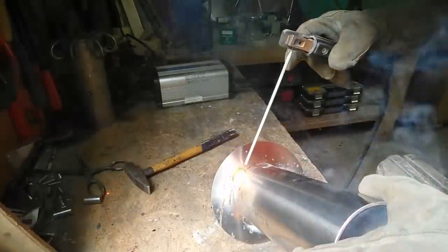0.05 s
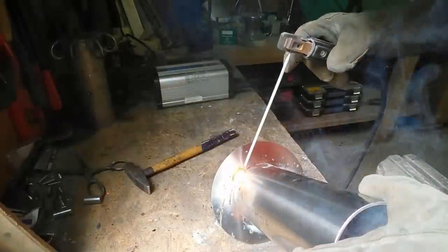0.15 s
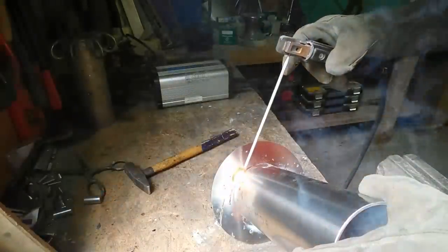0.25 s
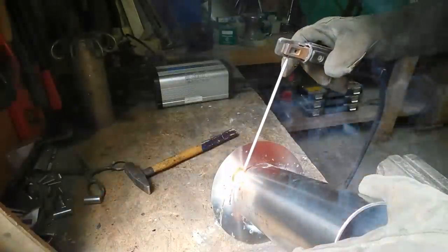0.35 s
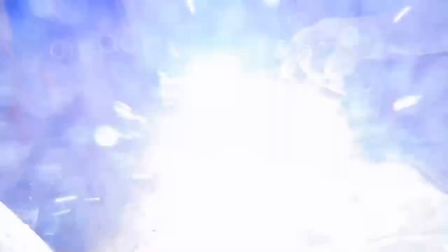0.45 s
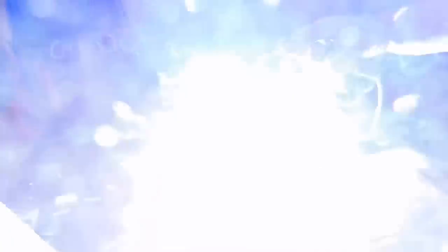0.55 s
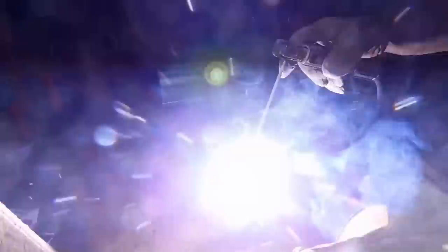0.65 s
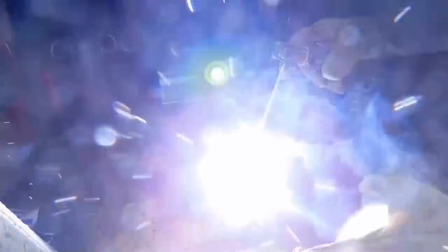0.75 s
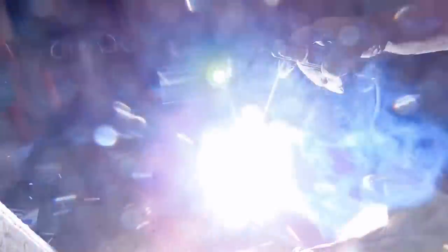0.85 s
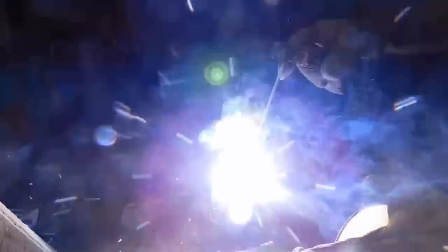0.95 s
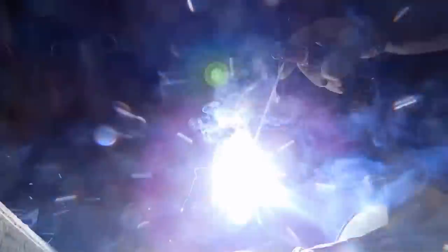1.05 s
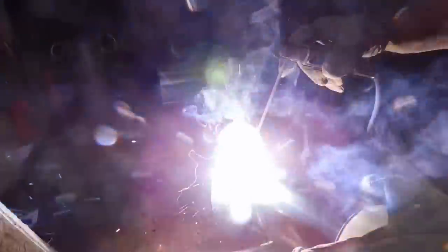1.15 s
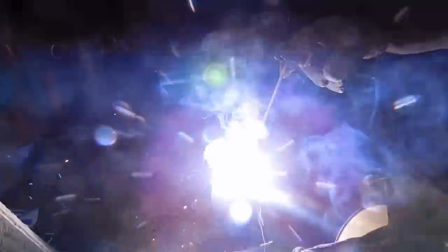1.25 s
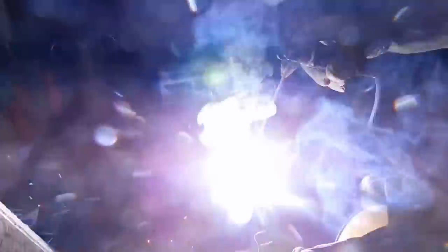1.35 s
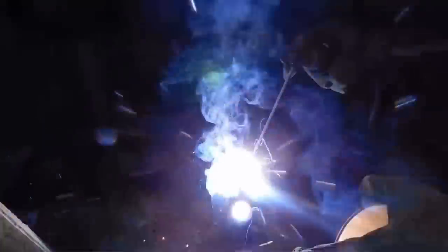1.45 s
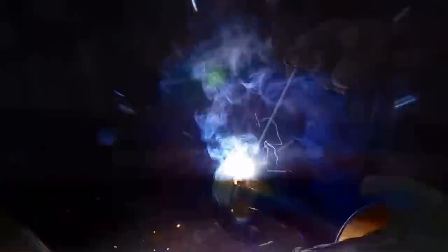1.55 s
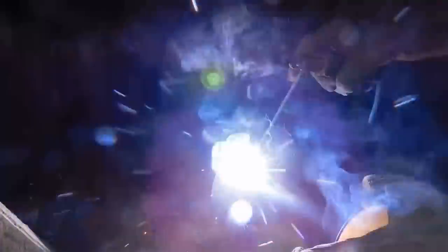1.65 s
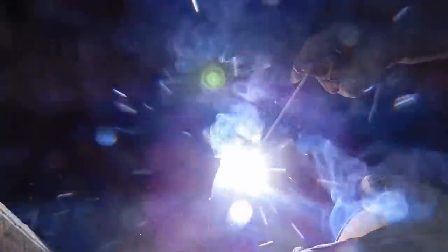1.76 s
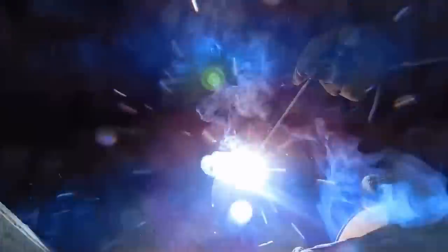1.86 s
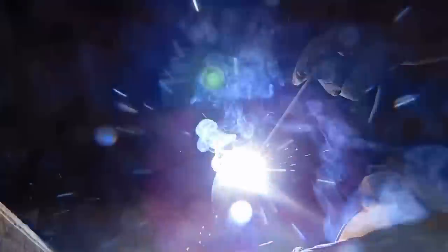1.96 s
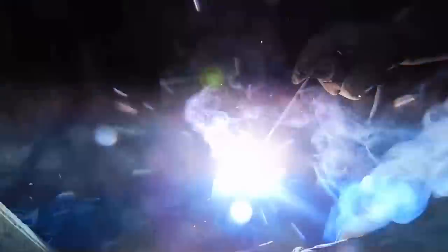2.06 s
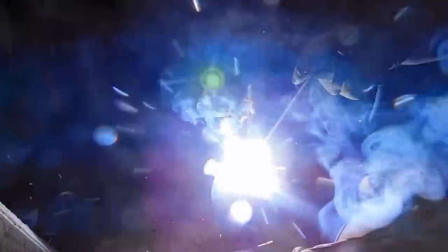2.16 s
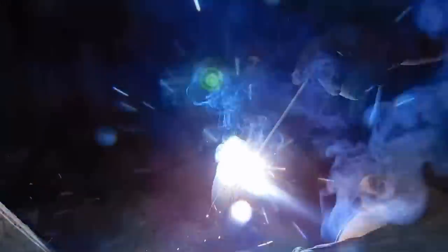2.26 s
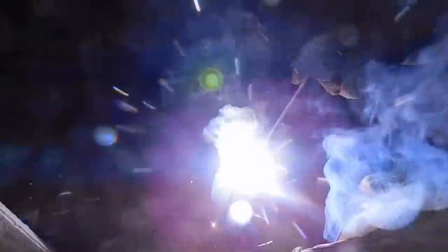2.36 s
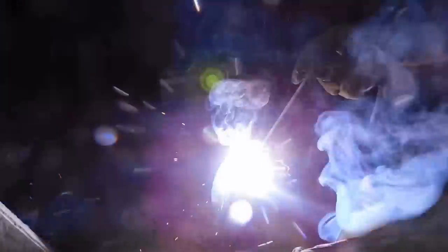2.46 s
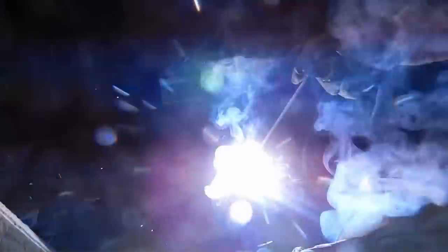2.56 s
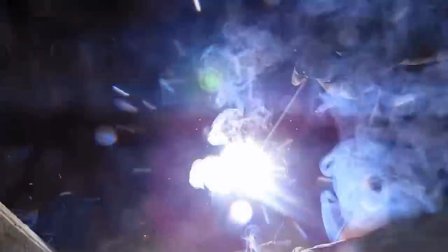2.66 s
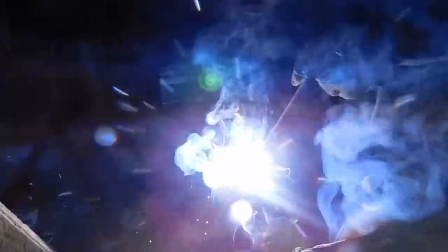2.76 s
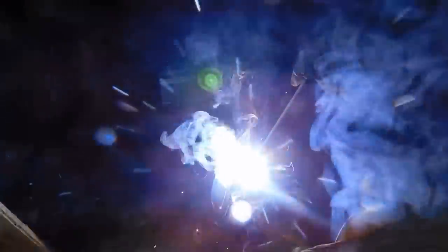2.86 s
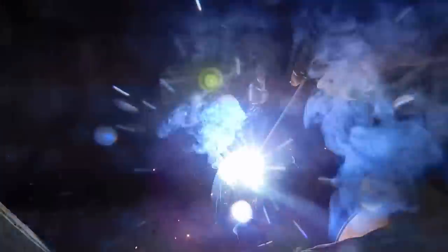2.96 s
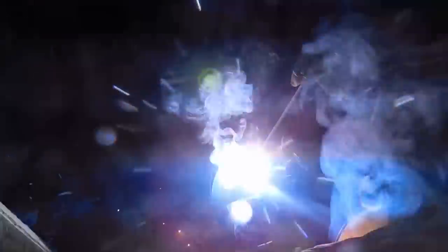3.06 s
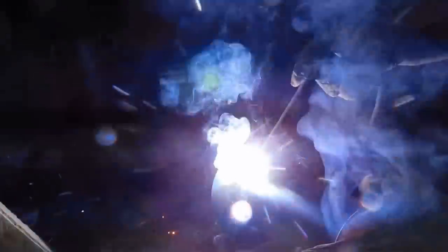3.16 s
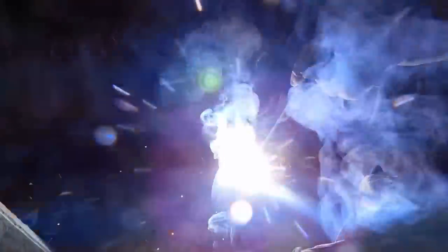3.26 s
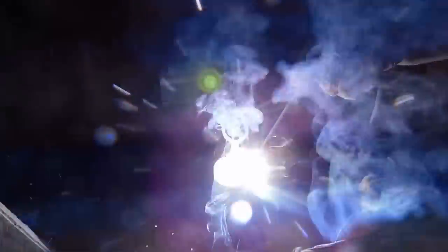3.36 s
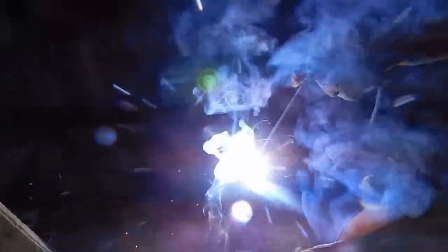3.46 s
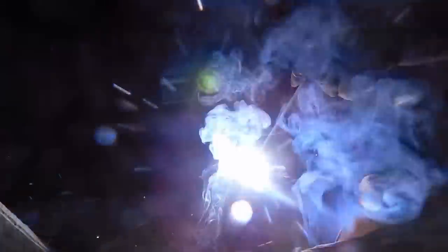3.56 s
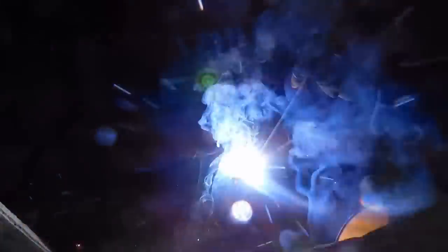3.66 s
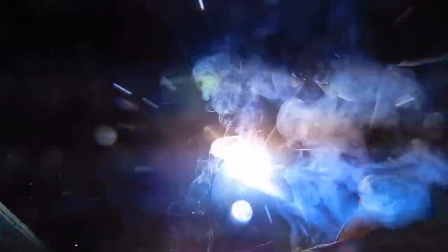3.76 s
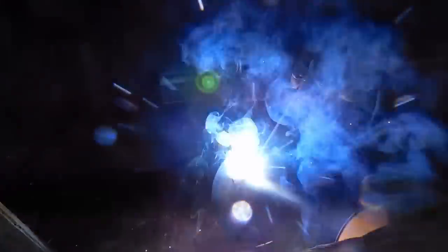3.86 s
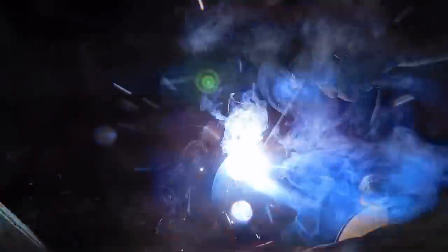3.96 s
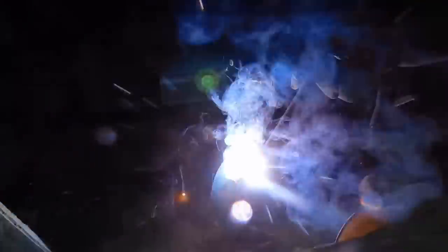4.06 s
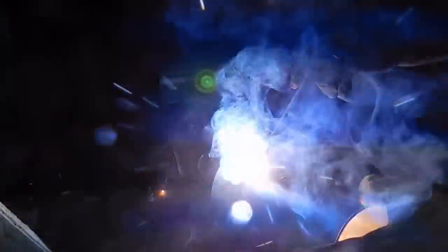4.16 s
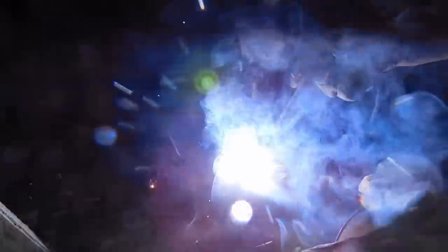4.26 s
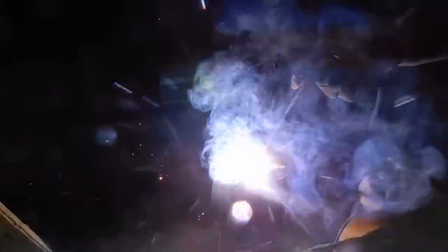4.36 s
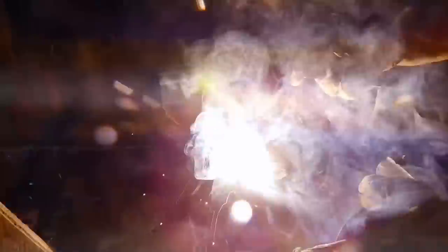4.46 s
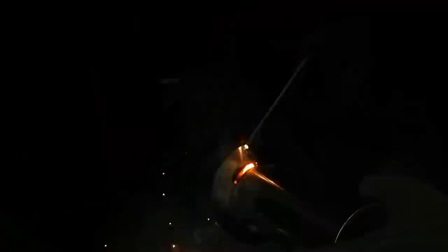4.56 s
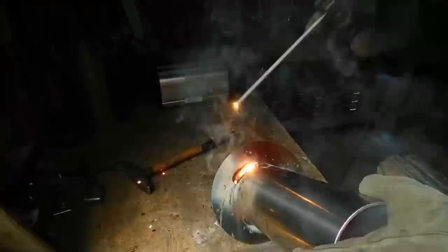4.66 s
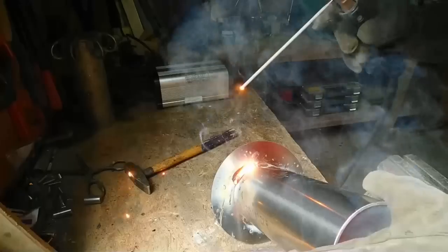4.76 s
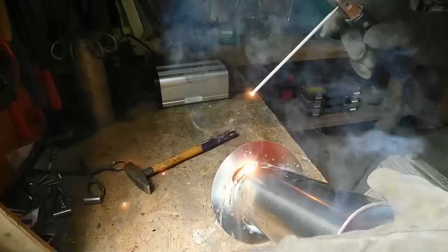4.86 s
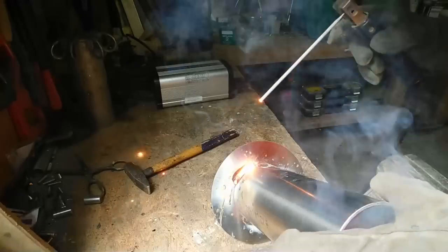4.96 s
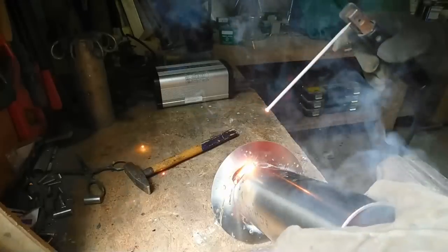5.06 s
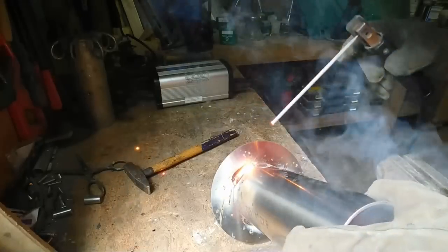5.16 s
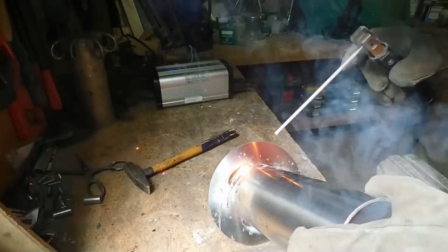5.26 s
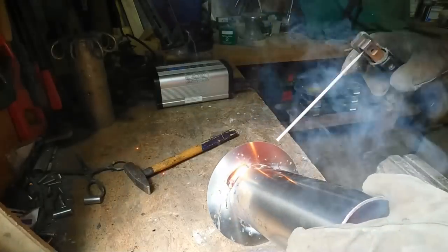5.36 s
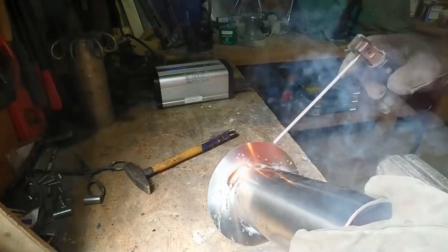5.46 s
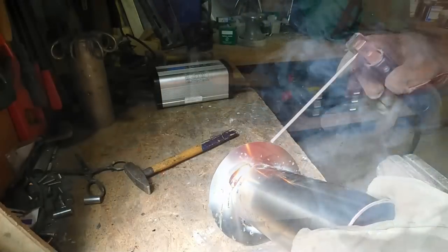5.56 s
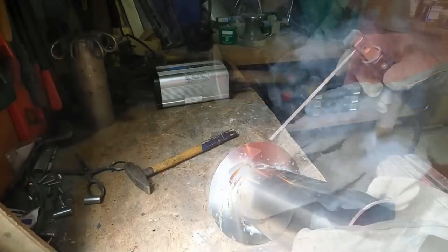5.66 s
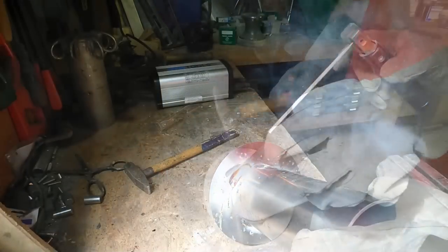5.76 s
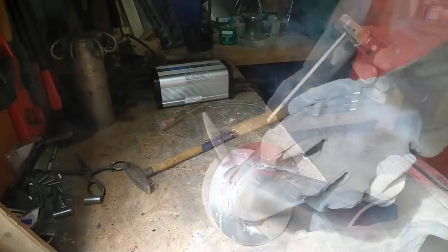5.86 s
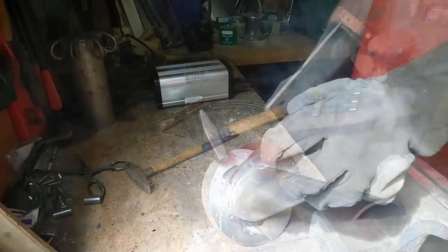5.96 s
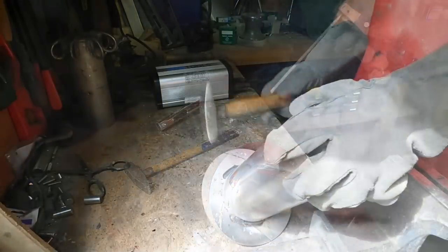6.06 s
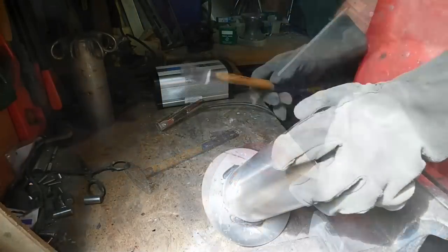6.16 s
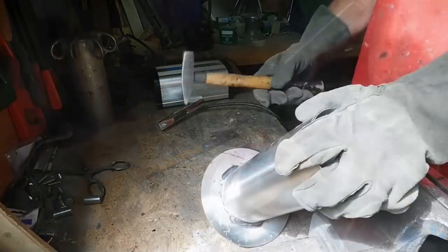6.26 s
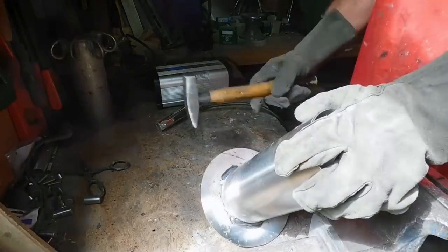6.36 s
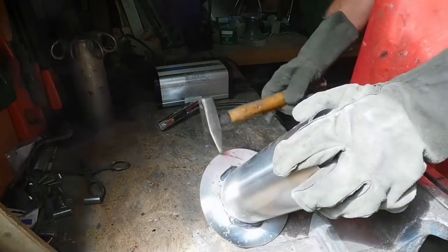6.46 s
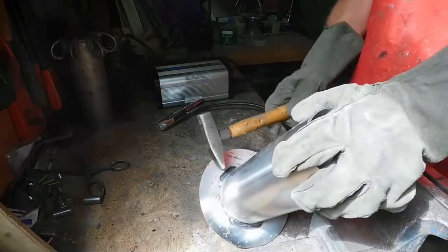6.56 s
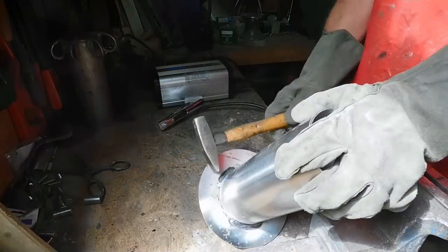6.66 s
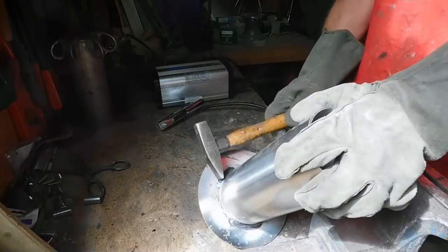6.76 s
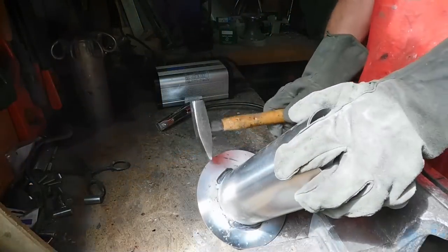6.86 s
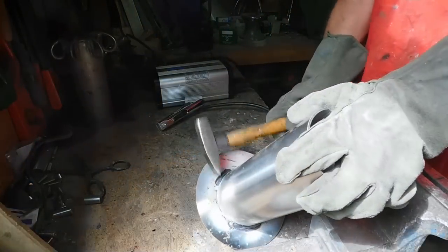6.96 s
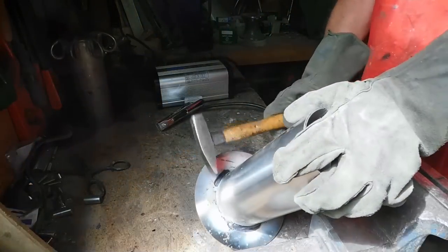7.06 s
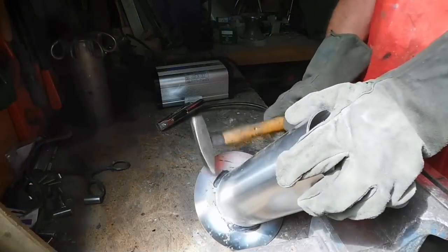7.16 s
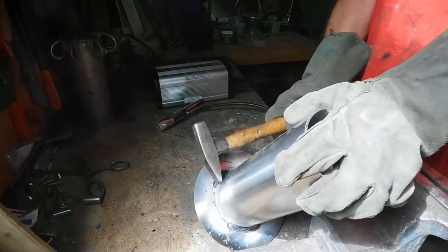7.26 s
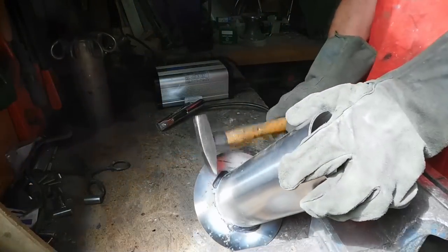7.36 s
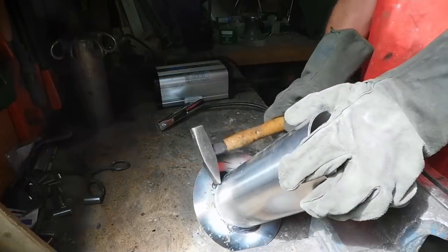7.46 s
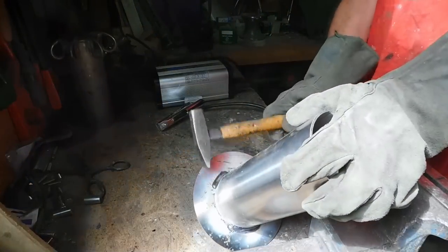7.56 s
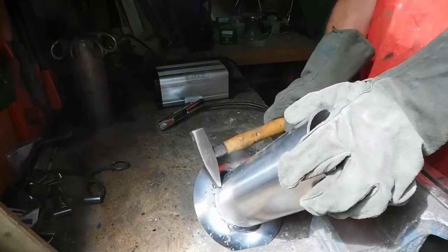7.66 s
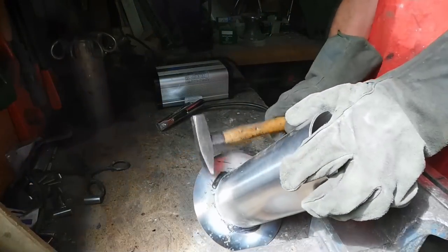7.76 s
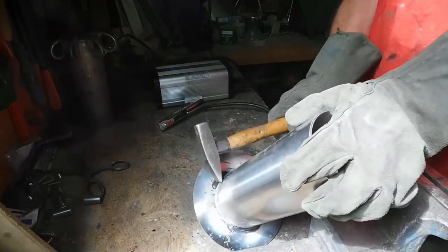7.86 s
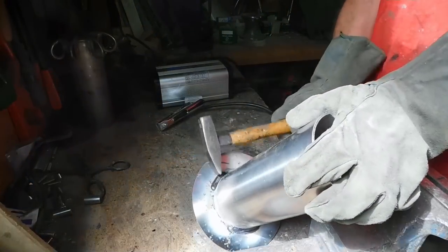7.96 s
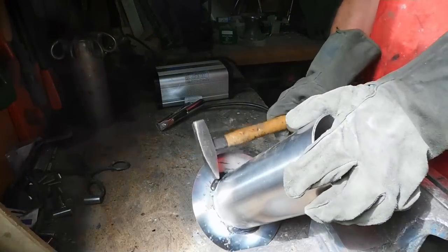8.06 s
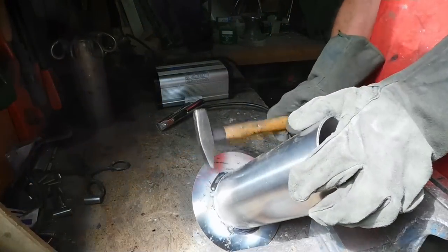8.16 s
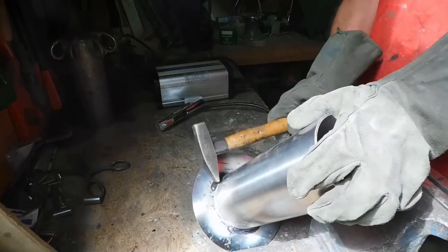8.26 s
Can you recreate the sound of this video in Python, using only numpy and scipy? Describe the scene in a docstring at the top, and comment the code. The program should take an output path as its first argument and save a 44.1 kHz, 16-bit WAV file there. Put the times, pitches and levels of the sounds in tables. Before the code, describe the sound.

A close stereo view of a workbench in a small, short-echoing workshop. At first only a soft fan is heard, airy with faint wavering tones, and a tiny metal tick. At about 0.45 s a welding arc ignites with a sharp snap, breaks off at 0.6, and catches again at 0.67. It crackles and sizzles until 4.5 s, rough and dense, strongest between 1 and 1.4, with irregular pops, bright spatter spurts and dull low sputter that swells and drops. It stops abruptly; the fan whirs on. Small ticks and soft knocks come at 5.1 to 5.3, firmer woody thuds near 5.5. A light metallic tap lands at 5.87, and the fan fades just after 6. Faint handling follows, then light taps at 6.58 and 6.7. From 6.96 to 8.2 hard hammer blows come roughly every 0.2 s, cracking, clattering and ringing the steel pipe in changing pitches, the flange rattling dully.

```python
"""A workbench in a small workshop: a steel pipe is stick-welded to its flange beside the welder's fan.
The arc (random clicks shaped by filters) strikes, falters, then crackles for about four seconds.
Dull noise bursts follow as the electrode holder is put down; the fan (noise and wavering tones) fades away.
A chipping hammer knocks the slag off: hard cracks, decaying pipe modes and sprays of clatter,
with a flange that rattles on the bench and a gain control that ducks the loud peaks."""
import sys
import numpy as np
from scipy import signal
from scipy.fft import rfft, irfft
from scipy.io import wavfile
from scipy.ndimage import uniform_filter1d

SR = 44100
rng = np.random.default_rng(int(sys.argv[2]) if len(sys.argv) > 2 else 0)


def transcribe(u):
    """Save the signal u as a 16-bit wav file named by the first command-line argument.

    u: samples, shape (n,) or (channels, n), limited to [-1, 1]; the rate is SR.
    q: integer samples, one column per channel.
    """
    v = np.clip(np.atleast_2d(u).T, -1, 1)
    q = np.round(v * 32767).astype(np.int16)
    wavfile.write(sys.argv[1], SR, q)


N = 366471
TIME = np.arange(N) / SR

# All table levels are relative; gains in the functions shift them. t60_s is the time to fall by 60 dB.
# Arc burning: on_s, off_s
BURN_SPANS = [(0.461, 0.603), (0.667, 4.515)]
# Vigour of the arc: time_s, crackle_level_db, sizzle_level_db
ARC_VIGOUR = [(1.1, -34.5, -40), (1.25, -34, -37.5), (1.36, -35.5, -42), (1.48, -40.5, -42),
              (2.35, -40, -42.5), (2.43, -35.5, -40.5), (2.7, -38.5, -41), (3.15, -38.5, -40.5),
              (3.8, -39, -42.5), (4.0, -41, -44), (4.34, -36.5, -44), (4.36, -40.5, -46),
              (4.45, -36, -38.5), (4.51, -35, -44)]
# Bass of the arc, which swells and drops out: time_s, level_db
ARC_BASS_LEVEL = [(0.68, -65), (0.7, -56), (0.85, -57), (1.02, -57), (1.05, -46.5), (1.12, -58),
                  (1.22, -45.5), (1.32, -57), (1.37, -45.5), (1.46, -61), (1.6, -52.5), (1.86, -53),
                  (2.01, -52), (2.04, -62), (2.08, -60), (2.12, -53), (2.52, -49), (3.84, -53), (3.86, -56),
                  (4.0, -49), (4.06, -56), (4.5, -48.5)]
# Ignition and the biggest drops shorting the arc: start_s, level_db, lowpass_hz
DROP_POPS = [(0.4654, 8, 4130), (0.596, -7, 3500), (0.6046, 3, 3800), (0.668, 9, 3620), (0.7472, -2, 4530),
             (0.837, 2.5, 2980), (1.067, -2, 6000), (1.094, 0, 3000), (1.281, -4, 3000), (1.407, 3, 4030),
             (1.459, -1, 4030), (1.583, -0.5, 5000), (1.607, -2, 2400), (1.649, 2, 4800), (1.9145, 0, 4000),
             (1.9643, 3, 4160), (2.011, -2, 2400), (2.082, 1, 3000), (2.095, -2.5, 4000), (2.2931, 1, 4500),
             (2.4189, -3, 3000), (2.537, -1, 3000), (2.6276, -1, 4000), (2.6675, -7, 4560),
             (3.389, 0, 2600), (3.59, -5.5, 4000), (3.633, -8, 2200), (3.7586, 1.5, 3530),
             (3.814, -4, 4000), (3.9054, -2.5, 5000), (4.07, -9, 4000), (4.186, 0.5, 4500),
             (4.346, -1, 4500), (4.497, -2, 4000)]
# Strongest sprays of fine spatter: start_s, level_db, t60_s
SPATTER_SPURTS = [(0.466, -32, 0.17), (0.677, -26, 0.15), (0.755, -28, .07), (1.067, -26.5, 0.084),
                  (1.161, -33, .08), (1.579, -23.5, 0.063), (1.9647, -29, .06), (2.293, -30, .05),
                  (2.36, -32, .07), (3.5, -33, .05), (3.785, -28, 0.048), (3.898, -27.5, 0.092),
                  (3.964, -27, 0.046), (4.04, -28.5, 0.064), (4.40, -35, .15)]
# Gas bursting out of the molten pool: start_s, level_db, pitch_hz
GAS_PLOPS = [(1.047, -28.5, 348), (1.581, -31, 447), (2.011, -33, 756), (2.537, -42, 600), (3.5, -34, 300),
             (3.759, -47, 400), (3.989, -33.5, 356), (4.188, -35, 800)]
# Colour of the sparks: frequency_hz, density_db (per Hz)
SPARK_SPECTRUM = [(25, -9.5), (60, -6), (150, -8.5), (550, -8), (900, -6.5), (1800, -5.5), (2100, -1),
                  (3600, -0.46), (4200, -4), (6100, -3.5), (8400, -2), (9200, -3), (11000, -6), (15500, -9)]
# Short resonances of bench and pipe in the sparks (negative is a dip): centre_hz, width_hz, rise_db
SPARK_RESONANCES = [(1434, 66, 4.5), (1834, 30, -8.5), (4890, 440, 2.5), (6900, 180, 0), (7100, 140, 1),
                    (7630, 74, 4.5), (12760, 200, 4.5)]
# Corner of pipe and flange, higher as the electrode moves along the seam: time_s, centre_hz
CORNER_GLIDE = [(0.5, 2090), (4.5, 2400)]
# Hammer blows: start_s, force_db, crack_db, chatter_t60_s, rebound_delay_s, rebound_db, rattle_s,
# zing_db, ring_db, ring_tilt_db_per_octave, singing_lift_db
HAMMER_BLOWS = [(5.865, -41.5, -15, 0.04, 0.012, -11, 0.0027, -75, -49.5, -3, 10),
                (6.5782, -43.5, -7, 0.18, 0.0099, -10, 0.0084, -72, -46.5, -2.8, 12),
                (6.7058, -33.5, -7, 0.092, 0.012, -15, 0.0069, -45, -43.5, 0, 11),
                (6.9574, -20, 8, 0.16, 0.021, 0, 0.056, -28, -30, -0.5, 7.5),
                (7.1701, -22, 11, 0.2, .014, -1, 0.089, -33, -26.5, 2.8, 6.5),
                (7.380, -21, 12, 0.1, 0.017, -5, 0.037, -46, -31.5, 4, 6),
                (7.575, -22, -2, 0.14, 0.019, 3, 0.044, -54, -34, 3.5, 3.5),
                (7.7806, -21, 3, 0.1, 0.017, -3.5, 0.035, -46, -32, 6.5, 4.5),
                (7.944, -20, 7.5, 0.12, 0.043, -8, 0.046, -43, -31, -0.2, 4),
                (8.15, -31, -2, 0.16, 0.015, 2, 0.027, -54, -44.5, 1.5, 10.5),
                (8.197, -22.5, -10, 0.11, 0.013, -7, 0.04, -41, -37, -5.5, 1.5)]
# Spot on the seam under each blow: place_m, singing_pitch_hz
BLOW_SPOTS = [(.302, 3734), (.698, 3734), (.178, 1390), (.354, 2408), (.112, 1215), (.408, 1555),
              (.428, 998), (.06, 998), (.564, 2408), (.48, 3734), (.17, 1215)]
# Modes of pipe and flange: frequency_hz
PIPE_MODE_HZ = [998, 1205, 1223, 1390, 1522, 1588, 2172, 2408, 2419, 2560, 2987, 3321, 3734, 3989, 4081,
                4549, 4807, 5157, 5399, 5792, 6831, 7120, 8123, 8516, 9330, 12350]
# Ringing of each of those modes: level_db, t60_s, left_minus_right_db
PIPE_MODE_RING = [(-3, 3.3, 2), (-3.5, 0.92, -9), (2.5, 1.44, -10.5), (-2, 0.44, -9), (1.2, 0.64, 2),
                  (0, 0.77, -2), (1.5, 0.31, 5), (10.5, 0.56, -13.5), (0, 0.35, -6), (-9, 0.18, 13),
                  (1.2, 0.41, 0), (0, 0.08, 11), (0.5, 0.31, -12), (0, 0.24, 26), (2.5, 0.21, -20),
                  (-8, 0.34, -2), (-22, 0.24, 11), (-8.5, 0.42, -3), (0, 0.14, -6), (-19, .1, 0),
                  (-14, 0.17, 0), (-4, 0.13, -3), (-27, .18, 0), (-8, 0.23, 4), (-16, 0.33, -3),
                  (-16, 0.15, 0)]
# Brightness looked up by force, low for light blows and high for heavy ones: force_db, lowpass_hz
FORCE_BRIGHTNESS = [(-24, 3100), (-37, 4400), (-22, 19000), (-19.5, 13300)]
# Clatter of pick, slag and flange: frequency_hz, density_db (per Hz)
CLATTER_SPECTRUM = [(25, -2), (90, -5.5), (220, -3), (500, -8), (850, -1.5), (1400, -1), (2200, 1.5),
                    (3600, -2), (5000, -4.5), (6100, -8.5), (7500, -6.5), (10000, -13), (15500, -15)]
# Short resonances of pick and flange (negative is a dip): centre_hz, width_hz, rise_db
CLATTER_RESONANCES = [(1660, 90, 3.5), (3140, 64, 5.5), (3420, 90, 5), (3790, 100, 6.5), (4570, 120, 3.5),
                      (5220, 70, 4), (6200, 390, -5), (7630, 120, 4), (8520, 130, 6.5)]
# Pick grazing the steel: start_s, level_db
PICK_GRAZES = [(6.031, -55), (6.68, -59)]
# High modes that a graze excites: frequency_hz, level_db, t60_s
GRAZE_RING = [(2987, -4.5, 0.48), (5230, -5, 0.36), (7214, -7, 0.18), (7900, -2, 0.24), (8123, -2, 0.14),
              (9900, 6, 0.16)]
# Things set down on the bench: start_s, level_db, t60_s, lowpass_hz
BENCH_KNOCKS = [(5.14, -45, 0.07, 2200), (5.287, -42, 0.12, 700), (5.4686, -28.5, 0.071, 1700),
                (5.5693, -27, 0.031, 4470), (5.582, -31.5, 0.048, 2530), (6.313, -54.5, 0.079, 900),
                (6.435, -40.5, 0.012, 4470)]
# Bench top: frequency_hz, density_db (per Hz)
BENCH_SPECTRUM = [(40, -24), (90, -13), (140, -14), (240, -1), (323, -6.5), (480, 3), (650, 1), (845, 0.5),
                  (1300, -10), (2100, -5.5), (3200, -12), (4200, -7), (7000, -13), (15000, -3.5)]
# Wooden resonances of the bench top: centre_hz, width_hz, rise_db
BENCH_RESONANCES = [(110, 25, 10), (245, 35, 10), (305, 50, 14), (860, 64, 7), (2100, 130, 8.5),
                    (2537, 140, 16), (4240, 120, 5)]
# Light ticks and scrapes of metal and slag: start_s, level_db, t60_s, pitch_hz
METAL_TICKS = [(0.264, -52.5, 0.036, 8000), (4.615, -50, 0.054, 9000), (5.139, -37, 0.075, 2730),
               (5.14, -47.5, 0.11, 11000), (6.004, -43.5, 0.066, 10100), (6.031, -40.5, 0.12, 8450),
               (6.335, -49, 0.21, 3120), (6.677, -42, 0.18, 8250)]
# Fan: time_s, level_db
FAN_LEVEL = [(0, -52), (0.4, -50.5), (0.8, -56.5), (4.65, -58.5), (4.95, -52), (5.4, -49.5), (5.7, -57.5),
             (5.95, -59.5)]
# Rush of the fan: frequency_hz, density_db (per Hz)
FAN_AIR_SPECTRUM = [(30, -31), (120, -22.5), (250, -10), (390, 6.5), (560, -6), (900, -0.5), (1150, -5),
                    (1550, -1), (2200, -8), (3200, -18), (6000, -21), (11000, -27), (16000, -28)]
# Blade tones: frequency_hz, width_hz, level_db
BLADE_TONES = [(388, 45, -15), (1165, 6.8, -8), (1540, 26, -15.5)]
# Quiet of the workshop: frequency_hz, density_db (per Hz)
QUIET_SPECTRUM = [(30, -34), (150, -28), (400, -16.5), (1000, -2.5), (2500, -8.5), (6000, -19),
                  (15000, -25.5)]

# the electrode touches and fizzes feebly, relative to the full arc, until the arc holds
TOUCH_S, FIZZ_DB, DIE_OUT_S = 0.42, -15.5, 0.0029
# a cold electrode crackles and sizzles less until it has warmed up
COLD_CRACKLE_DB, COLD_SIZZLE_DB, WARM_UP_S = -5, -8, 1
POOL_HZ = 740  # the arc's bass lies below this
# bending wavelength at 1 kHz; share of a mode that still sounds when it is struck on a node
WAVELENGTH_M, NODE_SHARE = 0.17, 0.2
SINGING_WIDTH = 0.034  # modes within this share of the singing pitch are lifted with it
TILT_TOP_HZ = 3200  # the spectral tilt of the ring is level above this
ZING_HZ, ZING_SWELL_S = 4807, 0.032
FAN_FADE_S, FAN_FADE_DB_PER_S = 6.04, 72
ROOM_T60_S = 0.19
CUTOFF_HZ = 15850


def arc(split_hz=5200, crackle_db=3.0, sizzle_db=4.0, hiss_db=-10.0, ripple_db=1.0, bass_db=14.5,
        sputter_db=-5.5, waver_db=2.5, layers=2):
    """Impulsive discharge: shorting drops crackle, spatter sizzles in clumps, current ripples at twice mains."""
    crackle_level, sizzle_level = in_time(ARC_VIGOUR)
    since_strike = np.maximum(TIME - BURN_SPANS[0][0], 0)
    cold = np.clip(1 - (since_strike / WARM_UP_S) ** 2, 0, 1)
    crackle_level = crackle_level + COLD_CRACKLE_DB * cold + 0.1 * drift(7.4)
    sizzle_level = sizzle_level + COLD_SIZZLE_DB * cold
    ripple = np.sin(2 * np.pi * 100 * TIME)
    current = burning() * from_db(ripple_db * ripple + 1.0 * drift(58))
    clumps = from_db(1.57 * drift(86))
    out, pool = 0, 0
    for layer in range(layers):  # layers of crackle and sizzle, each with its own echoes, add up to one arc
        drops = grains(per_s=150, spread_db=2.5)
        small_drops = 0.86 * grains(per_s=190, spread_db=1.0)
        crackle = rms_one(drops + small_drops + from_db(hiss_db) * rng.standard_normal(N))
        sizzle = rms_one(0.42 * drops + grains(per_s=4000, spread_db=3.0) * clumps)
        middle = cut(cut(crackle, split_hz, "low", order=3), POOL_HZ, "high", order=3)
        treble = cut(sizzle, split_hz, "high", order=3)
        sparks = middle * from_db(crackle_level + crackle_db) + treble * from_db(sizzle_level + sizzle_db)
        out = out + workshop(sparks * current, wet_db=-1.5, pan_db=-2.0)
        pool = pool + crackle
    # the molten pool sputters dully at a wavering level
    sputter = from_db(sputter_db) * grains(per_s=98, spread_db=4.0)
    pool = cut(pool + sputter, POOL_HZ, "low", order=3)
    pool *= current * from_db(in_time(ARC_BASS_LEVEL)[0] + bass_db + waver_db * drift(20))
    out = out + workshop(pool, wet_db=-1.0, pan_db=-4.5)
    return coloured(out / np.sqrt(layers), SPARK_SPECTRUM, SPARK_RESONANCES)


def burning():
    """Discharge envelope, 0-1: the arc lights at once and is extinguished along a short linear ramp."""
    lit = sum((TIME >= on) * np.clip(1 - (TIME - off) / DIE_OUT_S, 0, 1) for on, off in BURN_SPANS)
    fizz = from_db(FIZZ_DB) * (TIME > TOUCH_S) * (TIME < BURN_SPANS[-1][0])
    return np.maximum(lit, fizz)


def pops(level_db=-4.5, spray_db=-18.5, spray_t60=0.012):
    """Impulse radiation: a big drop goes off in one sharp, low-passed pulse with a short spray."""
    out = np.zeros(N)
    for start_s, db, lowpass_hz in DROP_POPS:
        pop = burst(db + spray_db, spray_t60)
        pop[0] += from_db(db)
        add(out, start_s, cut(pop, lowpass_hz, "low"))
    sparks = coloured(from_db(level_db) * out, SPARK_SPECTRUM, SPARK_RESONANCES)
    return workshop(sparks, wet_db=-1.0, pan_db=-2.0)


def spurts(per_s=12, level_db=5.5, t60=0.043, edge_hz=8500, strong_edge_hz=8000):
    """Shot noise with exponential decay: drops spray fine spatter, a short bright hiss that starts at once."""
    starts = (rng.random(N) < per_s / SR) * from_db(rng.normal(0, 1.5, N))
    decay_per_sample = from_db(-60 / (t60 * SR))
    spray = signal.lfilter([1], [1, -decay_per_sample], starts + 1e-18)
    level = from_db(in_time(ARC_VIGOUR)[1] + level_db)
    hiss = cut(grains(per_s=4300, spread_db=1.0), edge_hz, "high") * spray * burning() * level
    for start_s, db, length_s in SPATTER_SPURTS:
        add(hiss, start_s, cut(burst(db, length_s), strong_edge_hz, "high"))
    return workshop(coloured(hiss, SPARK_SPECTRUM, SPARK_RESONANCES), wet_db=-2.0, pan_db=-1.0)


def plops(level_db=-4.0, cycles=6.7):
    """Damped bubble oscillation: a burst gas bubble falls by 60 dB within a few cycles."""
    out, age = np.zeros(N), TIME[:SR // 8]
    for start_s, db, hz in GAS_PLOPS:
        decay = from_db(level_db + db - 60 * age * hz / cycles)
        add(out, start_s, np.sin(2 * np.pi * hz * age) * decay)
    return workshop(out, wet_db=-7.0, pan_db=-2.5)


def corner(x, rise_db=2.0, width_hz=300, size=2048):
    """Cavity resonance: a broad two-pole band between pipe and flange glides slowly, block by block."""
    out, state = np.zeros((2, N)), np.zeros((2, 2))
    radius, centre_hz = np.exp(-np.pi * width_hz / SR), in_time(CORNER_GLIDE)[0]
    zeros = (1 - radius ** 2) / 2 * np.array([1, 0, -1])
    for i in range(0, N, size):
        poles = [1, -2 * radius * np.cos(2 * np.pi * centre_hz[i] / SR), radius ** 2]
        out[:, i:i + size], state = signal.lfilter(zeros, poles, x[:, i:i + size], zi=state)
    return x + (from_db(rise_db) - 1) * out


def pick(level_db=0.0, low_hz=1300, contact_hz=4100, zing_db=0.0):
    """Impact: contact time limits the top of one hard crack of steel on steel; then the pick zings briefly."""
    cracks, zings = np.zeros((2, N))
    age = TIME[:SR // 3]
    swell = age / ZING_SWELL_S * np.exp(1 - age / ZING_SWELL_S)
    zing = np.sin(2 * np.pi * ZING_HZ * age) * swell
    for start_s, _, crack_db, _, _, _, _, blow_zing_db, *_ in HAMMER_BLOWS:
        add(cracks, start_s, from_db([level_db + crack_db]))
        add(zings, start_s, np.sqrt(2) * from_db(zing_db + blow_zing_db) * zing)
    cracks = cut(cut(cracks, low_hz, "high", order=1), contact_hz, "low", order=8)
    return workshop(cracks, wet_db=0.0, pan_db=5.0) + panned(-1.0) * zings


def pipe_ring(lag_s=.00003, ring_db=-0.97):
    """Modal excitation: each blow stops the old ring and starts the modes anew, weakly if struck at a node."""
    out = np.zeros((2, N))
    starts = [int(row[0] * SR) for row in HAMMER_BLOWS] + [N]
    side_lag = np.array([[lag_s], [0]])  # the left hears the ring later
    for blow, spot, start, end in zip(HAMMER_BLOWS, BLOW_SPOTS, starts, starts[1:]):
        *_, level_db, tilt_db, singing_db = blow
        place_m, singing_hz = spot
        age = TIME[:end - start]
        for hz, (db, t60, pan_db) in zip(PIPE_MODE_HZ, PIPE_MODE_RING):
            # bending waves: the wave number grows with the root of frequency
            wave_number = 2 * np.pi / WAVELENGTH_M * np.sqrt(hz / 1000)
            shape = np.hypot(NODE_SHARE, np.cos(wave_number * place_m))
            strength_db = ring_db + db + level_db + tilt_db * np.log2(min(hz, TILT_TOP_HZ) / 2000)
            strength_db += singing_db / (1 + ((hz / singing_hz - 1) / SINGING_WIDTH) ** 4)
            phase = 2 * np.pi * (hz * (age - side_lag) + rng.random())
            decay = from_db(strength_db - 60 * age / t60)
            out[:, start:end] += np.sqrt(2) * shape * panned(pan_db) * decay * np.sin(phase)
    return out


def clatter(snap_db=0.0, snap_t60=0.024, rebound_t60=0.078, ragged_db=5.0, light_tap_hz=600):
    """Repeated impacts: slag snaps, the pick lands again on the rebound, flakes scatter over pipe and bench."""
    out = np.zeros(N)
    for start_s, db, _, t60, rebound_s, rebound_db, *_ in HAMMER_BLOWS:
        bright_hz = np.interp(db, *np.transpose(FORCE_BRIGHTNESS))
        chatter = burst(db, t60, per_s=1000, spread_db=3.0)
        late = int(max(rebound_s, .001) * SR)
        chatter[late:] += burst(db + rebound_db, rebound_t60, per_s=2000)[:-late]
        chatter *= from_db(ragged_db * drift(43)[:len(chatter)])
        snap = cut(burst(db + snap_db, snap_t60), bright_hz / 2, "low", order=1)
        blow = snap + cut(chatter, bright_hz, "low", order=1)
        # only heavy blows shake the bench and reach the bass
        bass_edge_hz = np.interp(db, [-42, -26], [light_tap_hz, 20])
        add(out, start_s, cut(blow, bass_edge_hz, "high", order=1))
    ringing = steel(out, level_db=-6.0)
    return workshop(coloured(ringing, CLATTER_SPECTRUM, CLATTER_RESONANCES), wet_db=-1.5, pan_db=-1.5)


def rattle(level_db=-18.5, settle_t60=0.026, low_hz=170, high_hz=900):
    """Intermittent contact: the flange dances on the bench with dull thuds for a moment, then settles."""
    out, age = np.zeros(N), TIME[:SR // 4]
    for start_s, db, _, _, _, _, length_s, *_ in HAMMER_BLOWS:
        contacts = grains(per_s=320, spread_db=1.5, size=len(age))
        thuds = rms_one(cut(cut(contacts, high_hz, "low"), low_hz, "high"))
        settling_db = -60 * np.maximum(age - length_s, 0) / settle_t60
        add(out, start_s, thuds * from_db(db + level_db + settling_db))
    return workshop(out, wet_db=-2.5, pan_db=-3.5)


def grazes():
    """Selective modal excitation: a glancing touch leaves a thin ring of high modes."""
    out, age = np.zeros(N), TIME[:SR // 2]
    for start_s, level_db in PICK_GRAZES:
        for hz, db, t60 in GRAZE_RING:
            add(out, start_s, np.sin(2 * np.pi * hz * age) * from_db(level_db + db - 60 * age / t60))
    return panned(-2.5) * out


def handling():
    """Impact on wood and steel: low-passed bursts knock on the bench, band-limited ones tick on metal."""
    knocks, ticks = np.zeros((2, N))
    for start_s, db, t60, hz in BENCH_KNOCKS:
        add(knocks, start_s, cut(burst(db, t60, per_s=2500), hz, "low"))
    for start_s, db, t60, hz in METAL_TICKS:
        add(ticks, start_s, cut(cut(burst(db - 3.5, t60), hz * 1.43, "low"), hz / 2.0, "high"))
    bench = coloured(knocks, BENCH_SPECTRUM, BENCH_RESONANCES)
    return workshop(bench + steel(ticks, level_db=-7.5), wet_db=-2.5, pan_db=-2.0)


def steel(x, level_db, t60=0.058, count=44):
    """Modal density: sharp contacts also set the pipe's many close high modes ringing."""
    age = TIME[:SR // 3]
    hz = 4600 + 11000 * (np.arange(count) + rng.random(count))[:, None] / count
    tones = np.sin(2 * np.pi * (hz * age + rng.random((count, 1))))
    modes = tones.sum(axis=0) * from_db(-60 * age / t60)
    return x + from_db(level_db) * signal.oaconvolve(x, modes / np.linalg.norm(modes))[:N]


def fan(waver=0.11):
    """Turbulence and blade tones: coloured noise with sinusoids of slightly wavering amplitude and phase."""
    air = coloured(rng.standard_normal(N), FAN_AIR_SPECTRUM)
    out = workshop(air, wet_db=-13.0, pan_db=-1.0) * from_db(-5.5)
    for hz, width_hz, db in BLADE_TONES:
        swing = 1 + waver * (drift(width_hz) + 1j * drift(width_hz))
        out += from_db(db) * rms_one(np.real(swing * np.exp(2j * np.pi * hz * TIME)))
    fade_db = FAN_FADE_DB_PER_S * np.maximum(TIME - FAN_FADE_S, 0)
    return out * from_db(in_time(FAN_LEVEL)[0] - fade_db)


def quiet():
    """Stationary background noise: independent coloured noise on the two sides."""
    return from_db(-63) * coloured(rng.standard_normal((2, N)), QUIET_SPECTRUM)


def workshop(x, wet_db, pan_db, near_db=5.0, near_t60=0.054, dull_hz=7000, scatter_hz=7500,
             scatter_t60=0.0092):
    """Room response: direct sound, quick reflections off bench and shelves, duller tail; echoes differ by side."""
    t = TIME[:SR // 3]
    case, near, far = rng.standard_normal((3, 2, len(t)))
    near = near * from_db(-60 * t / near_t60)
    far = cut(far, dull_hz, "low", order=1) * from_db(-60 * t / ROOM_T60_S)
    echoes = (from_db(near_db) * rms_one(near) + rms_one(far)) * (t > .001)
    echoes /= np.linalg.norm(echoes, axis=1, keepdims=True)
    # the right microphone is one sample nearer
    direct = np.eye(2, len(t))[::-1]
    # short waves scatter round the recorder's case on their way to each microphone
    case = case * from_db(-60 * t / scatter_t60)
    case /= np.linalg.norm(case, axis=1, keepdims=True)
    direct = cut(direct, scatter_hz, "low") + cut(case, scatter_hz, "high")
    paths = rfft(direct + from_db(wet_db) * echoes, 2 * len(t))
    # even out each path's spectrum, so the echoes add little colour of their own
    smooth_power = uniform_filter1d(abs(paths) ** 2, size=61, axis=1)
    response = irfft(paths / np.sqrt(smooth_power))[:, :len(t)]
    response /= np.linalg.norm(response.mean(axis=0))
    return panned(pan_db) * signal.oaconvolve(np.atleast_2d(x), response, axes=1)[:, :N]


def burst(level_db, t60, per_s=9000, spread_db=2.0):
    """Exponential decay: a spray of tiny contacts starts at once and dies away."""
    age = TIME[:SR // 3]
    return grains(per_s, spread_db, size=len(age)) * from_db(level_db - 60 * age / t60)


def grains(per_s, spread_db, size=N):
    """Shot noise: random clicks of uneven size and sign, rms 1."""
    at = np.flatnonzero(rng.random(size) < per_s / SR)
    sizes = from_db(spread_db * np.minimum(rng.exponential(1, size), 4))
    signs = rng.choice([-1, 1], size)
    out = np.zeros(size)
    out[at] = (sizes * signs)[at]
    return rms_one(out)


def drift(rate):
    """Low-pass random process: two equal poles at the given rate (Hz), spread about 1."""
    step = 40  # samples between computed points
    pole = np.exp(-2 * np.pi * rate * step / SR)
    noise = rng.standard_normal(N // step + 2002)
    slow = signal.lfilter([1], [1, -2 * pole, pole ** 2], noise)[2000:]  # skip the settling
    return np.interp(np.arange(N) / step, np.arange(len(slow)), rms_one(slow))


def coloured(x, spectrum, peaks=(), size=4096):
    """Minimum-phase filtering by folded cepstrum: spectrum plus peaks; white noise keeps its power."""
    hz, db = np.transpose(spectrum)
    bins = np.arange(size // 2 + 1) * SR / size
    gain_db = np.interp(np.log(bins + 1), np.log(hz), db)
    for centre_hz, width_hz, rise_db in peaks:
        gain_db = gain_db + rise_db / (1 + (2 * (bins - centre_hz) / width_hz) ** 2)
    cepstrum = irfft(np.log(from_db(gain_db)))[:size // 2]
    cepstrum[0] /= 2
    pulse = irfft(np.exp(rfft(2 * cepstrum, size)))
    pulse /= np.linalg.norm(pulse)
    return signal.oaconvolve(np.atleast_2d(x), pulse[None], axes=1)[:, :N]


def cut(x, hz, kind, order=2):
    """Butterworth response: low- or high-pass."""
    sos = signal.butter(order, min(hz, .45 * SR), kind, fs=SR, output="sos")
    return signal.sosfilt(sos, x + 1e-18)


def panned(pan_db):
    """Level-difference stereo: left and right gains of unit mean power."""
    return rms_one(from_db([[pan_db / 2], [-pan_db / 2]]))


def in_time(rows):
    """Linear interpolation: each column of a curve at every sample."""
    time_s, *columns = np.transpose(rows)
    return [np.interp(TIME, time_s, column) for column in columns]


def add(out, start_s, piece):
    """Superposition: mix a short sound in at its time."""
    start = int(start_s * SR)
    out[start:start + len(piece)] += piece[:N - start]


def rms_one(x):
    """Power normalisation: scale to rms 1."""
    return x / np.sqrt(np.mean(x ** 2) + 1e-20)


def from_db(db):
    """Decibel law: amplitude ratio of a level."""
    return 10 ** (np.asarray(db) / 20)


def scene():
    """Superposition of welding, hammering, handling and fan over the quiet of the room."""
    welding = corner(arc() + pops()) + spurts() + plops()
    hammering = pick() + pipe_ring() + clatter() + rattle() + grazes()
    return welding + hammering + handling() + fan() + quiet()


def record(dry, threshold_db=-23.0, squeeze=0.73, release_db_per_s=80.5, attack_hz=260, top=0.093,
           bass_loss=0.25):
    """Gain control: the left is thinner in the bass, loud peaks duck and swell back, the top is cut."""
    heard = dry - np.array([[bass_loss], [0]]) * cut(dry, 280, "low", order=1)
    power = uniform_filter1d(np.max(heard ** 2, axis=0), size=16)
    level_db = 10 * np.log10(np.maximum(power, 1e-12))
    over_db = np.maximum(level_db - threshold_db, 0) * squeeze
    # the reduction jumps up with a peak and falls back at a steady rate
    release_db = release_db_per_s * TIME
    held_db = np.maximum.accumulate(over_db + release_db) - release_db
    ducked = heard * from_db(-cut(held_db, attack_hz, "low", order=1))
    limited = top * np.tanh(ducked / top)
    return signal.sosfilt(signal.ellip(10, .2, 80, CUTOFF_HZ, fs=SR, output="sos"), limited)


dry = scene()
out = record(dry)
transcribe(out)
```